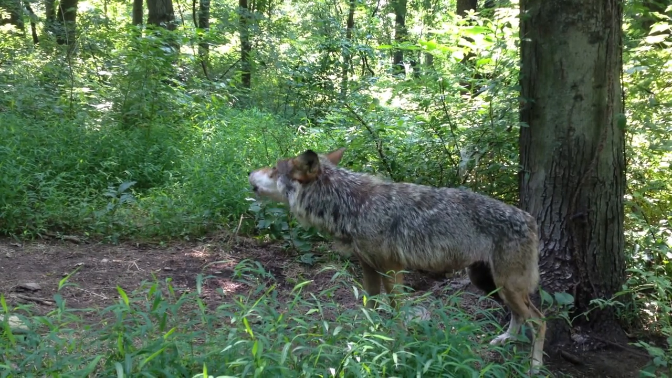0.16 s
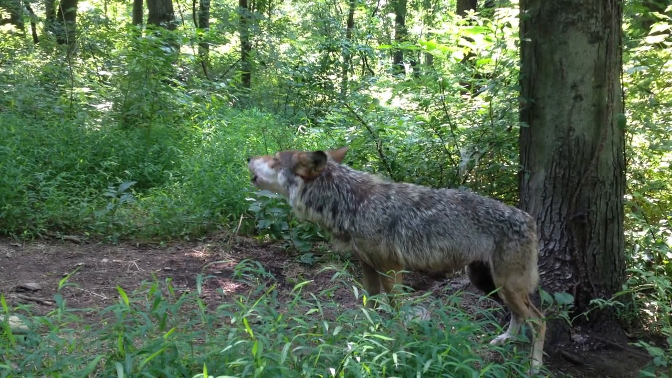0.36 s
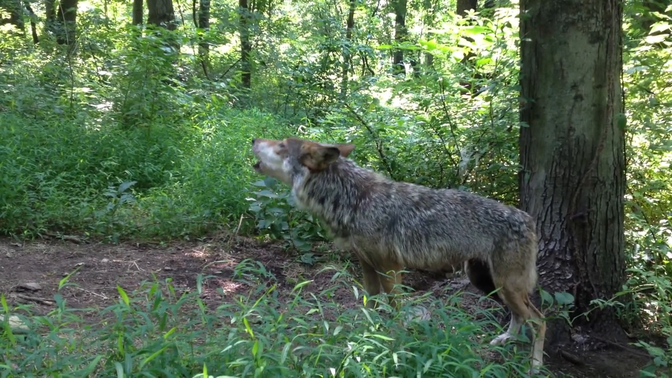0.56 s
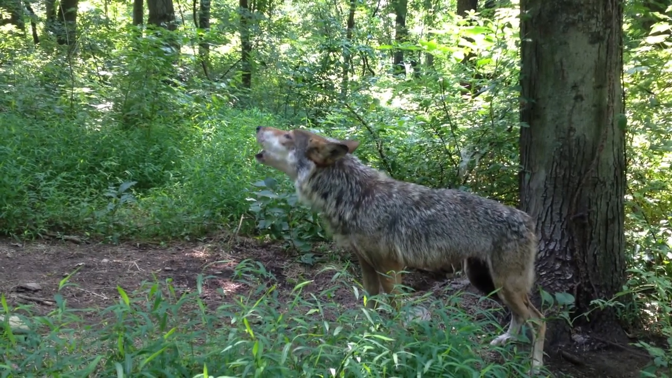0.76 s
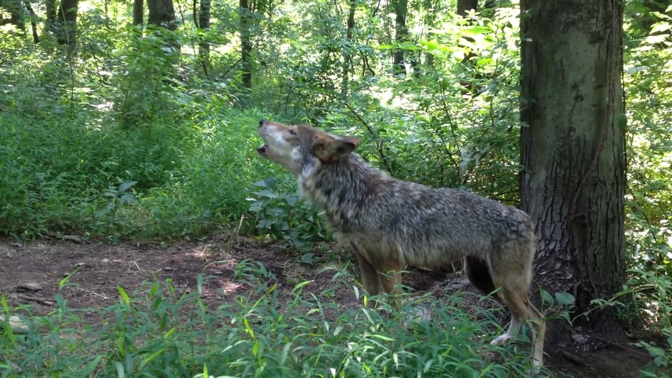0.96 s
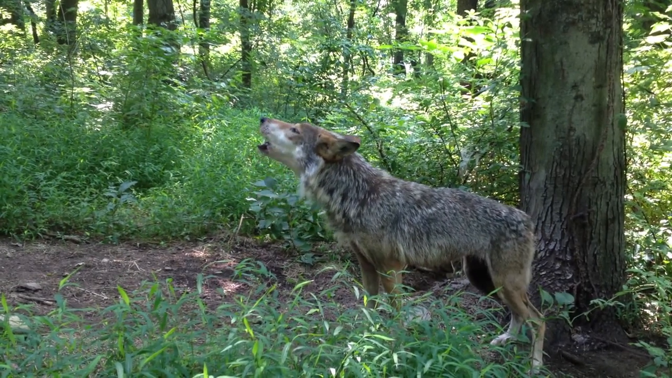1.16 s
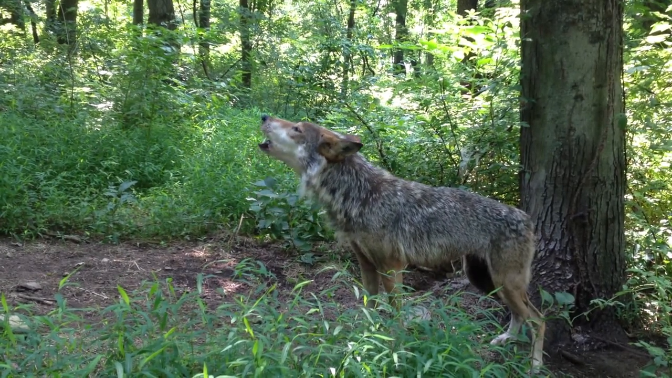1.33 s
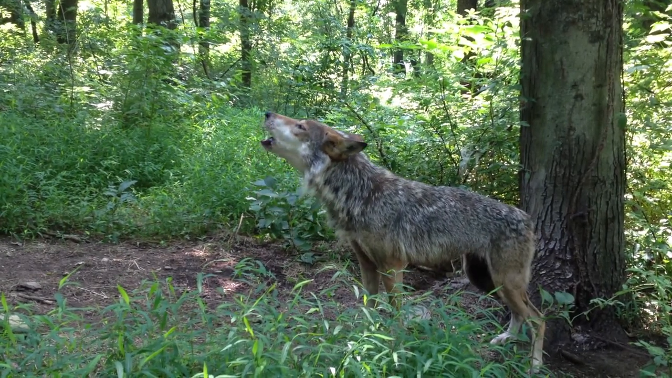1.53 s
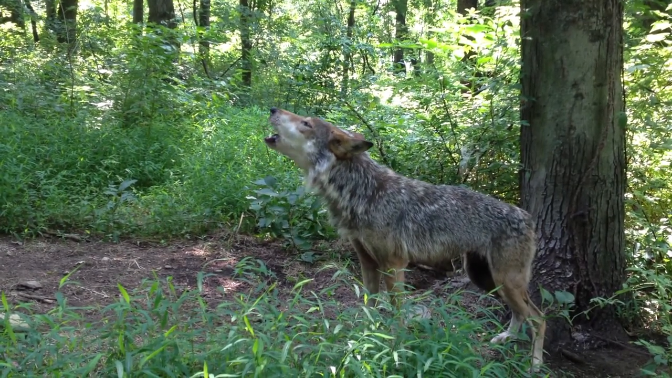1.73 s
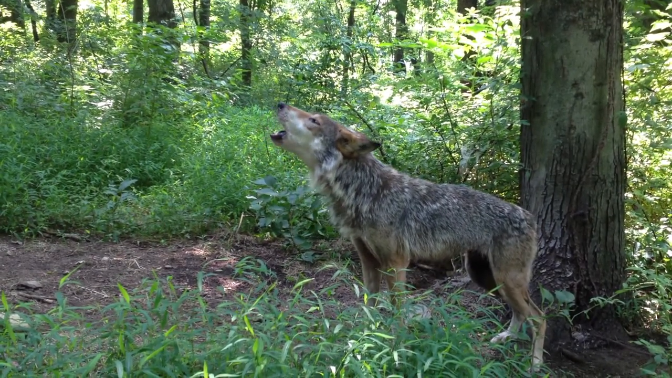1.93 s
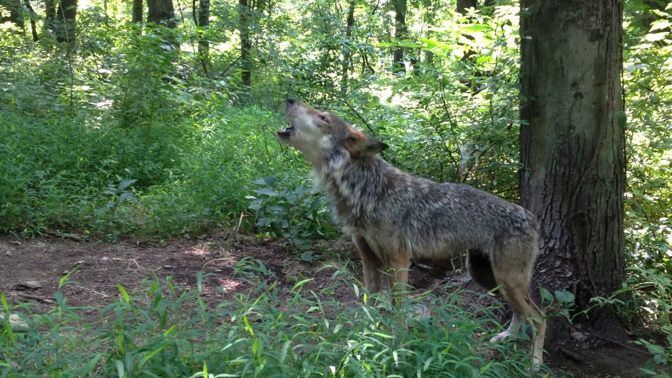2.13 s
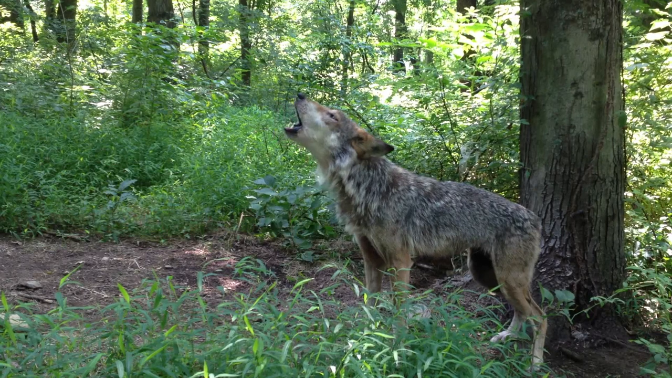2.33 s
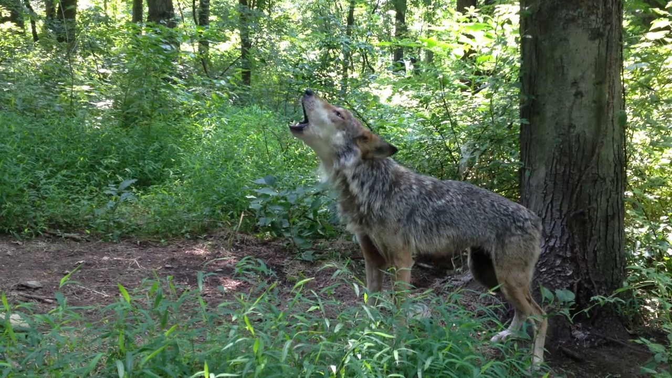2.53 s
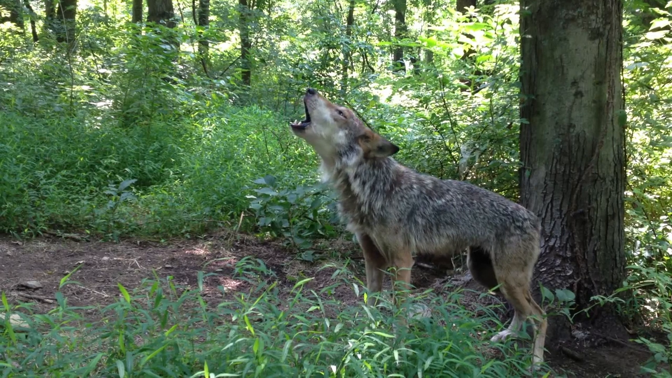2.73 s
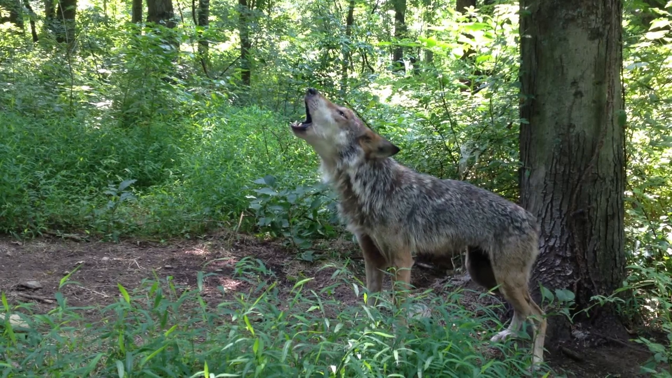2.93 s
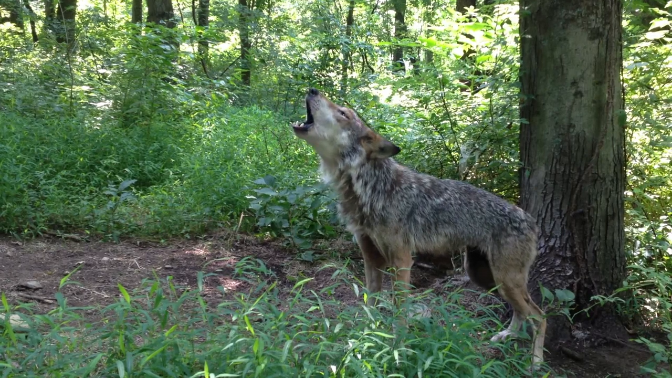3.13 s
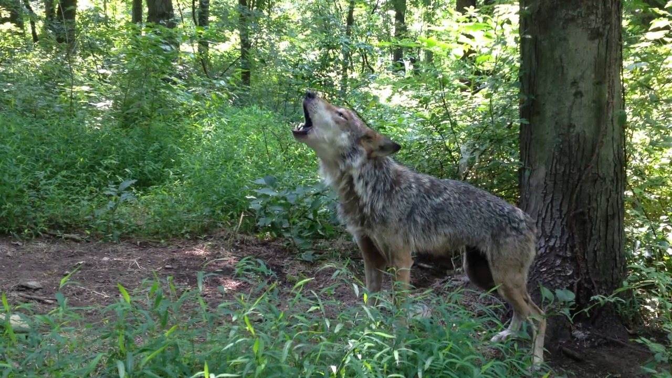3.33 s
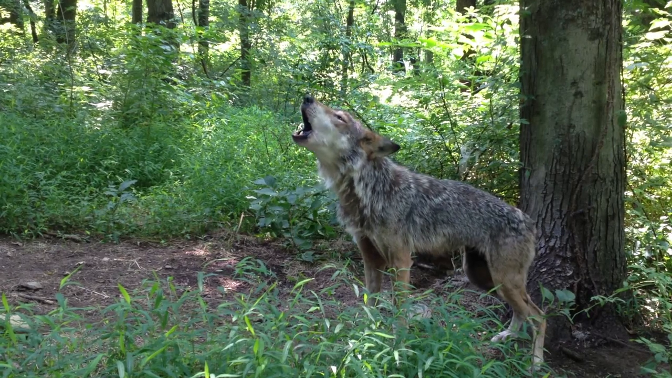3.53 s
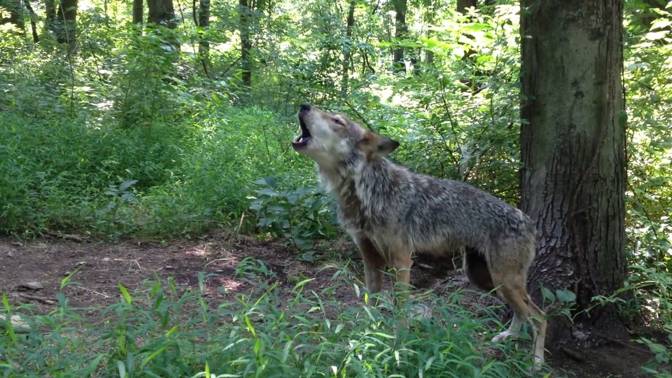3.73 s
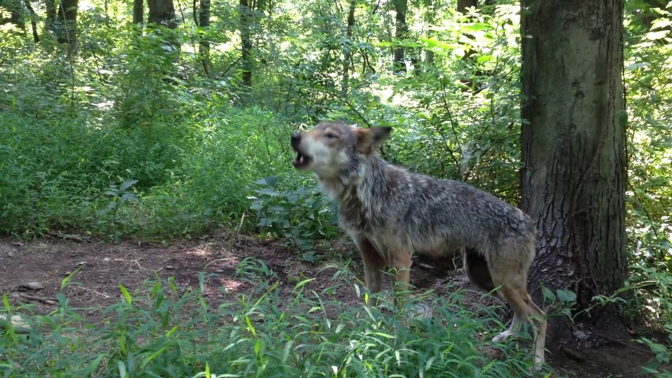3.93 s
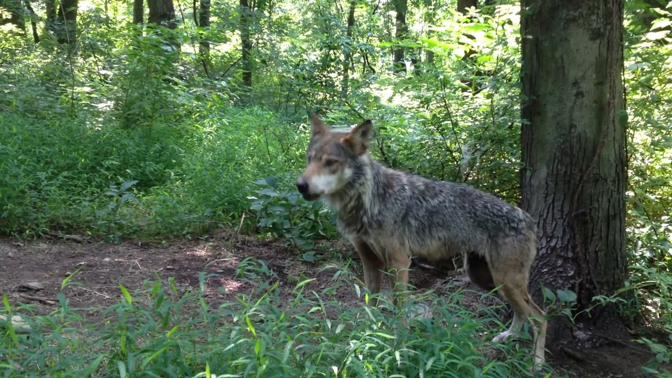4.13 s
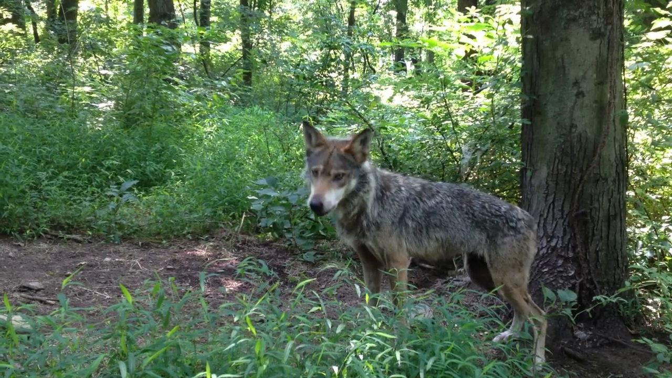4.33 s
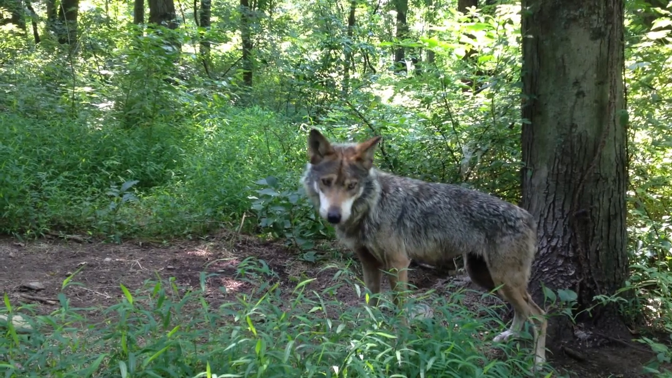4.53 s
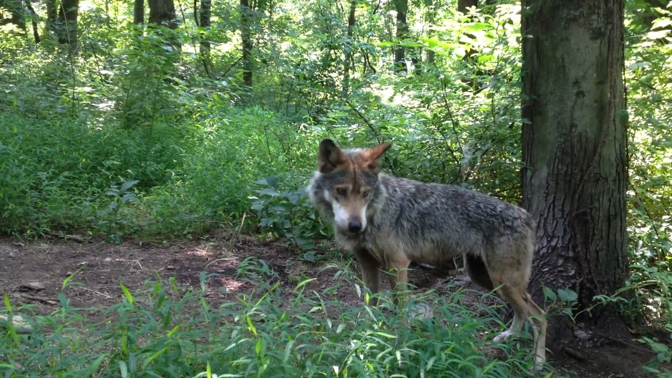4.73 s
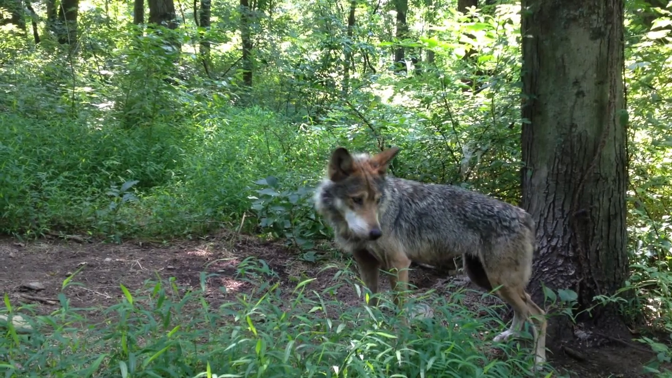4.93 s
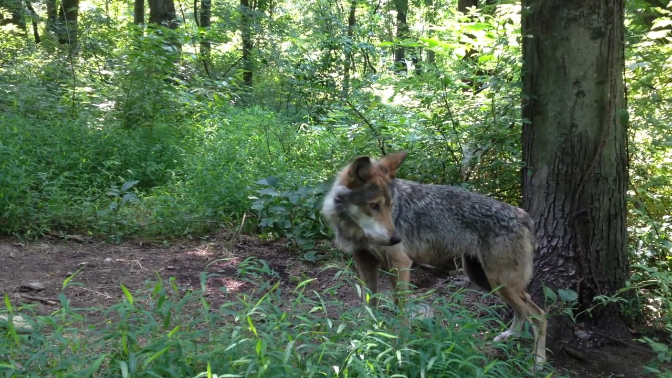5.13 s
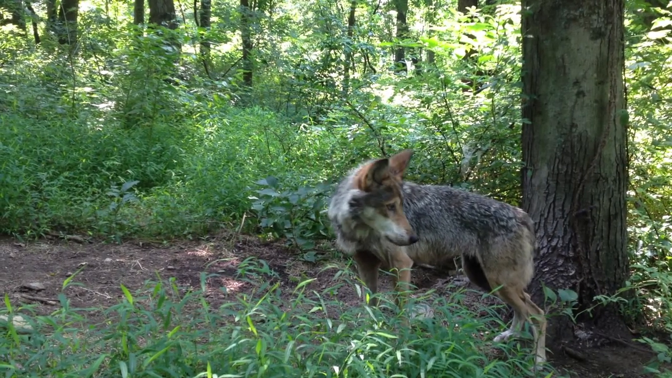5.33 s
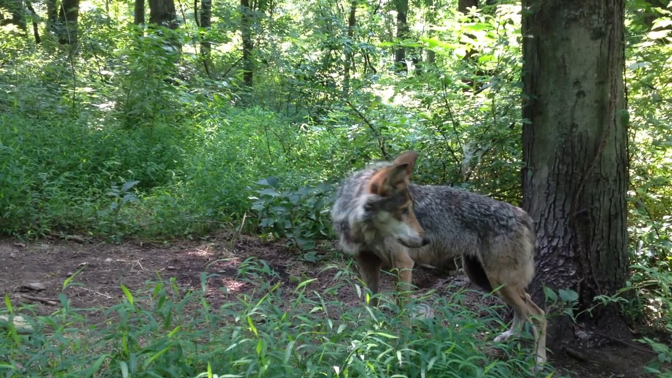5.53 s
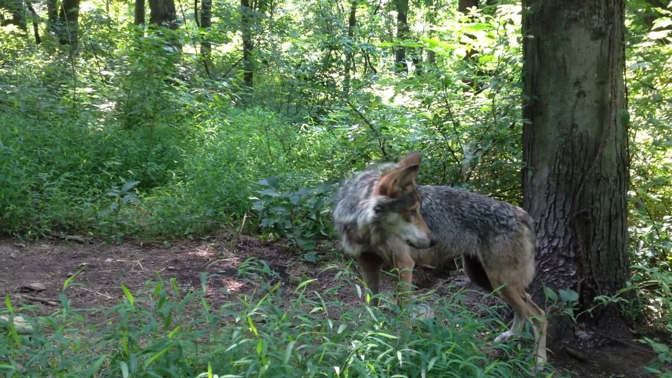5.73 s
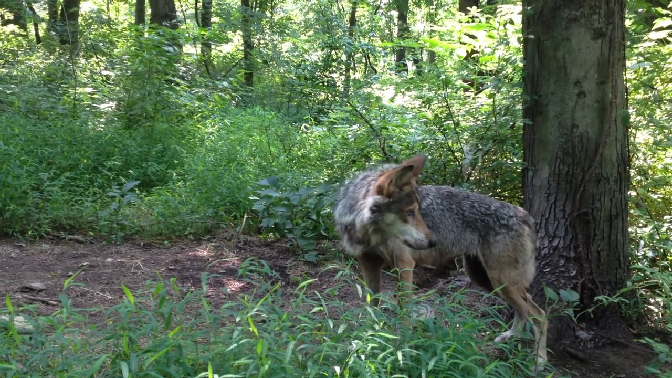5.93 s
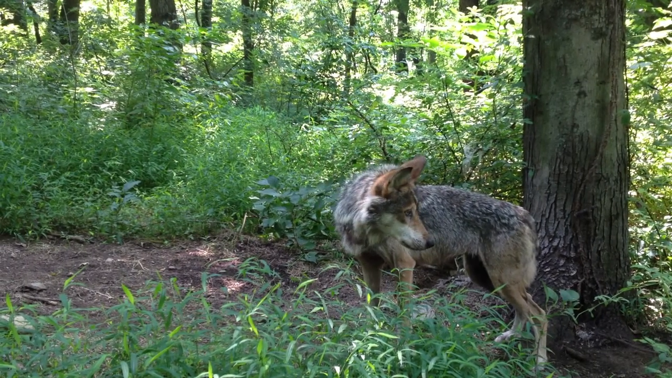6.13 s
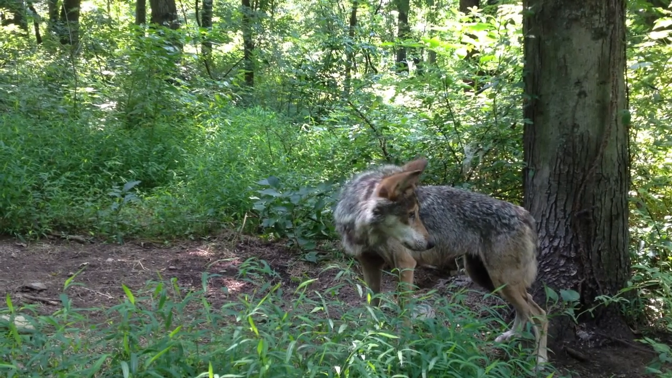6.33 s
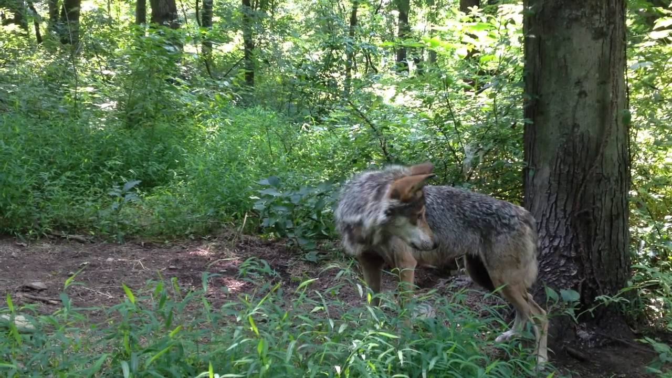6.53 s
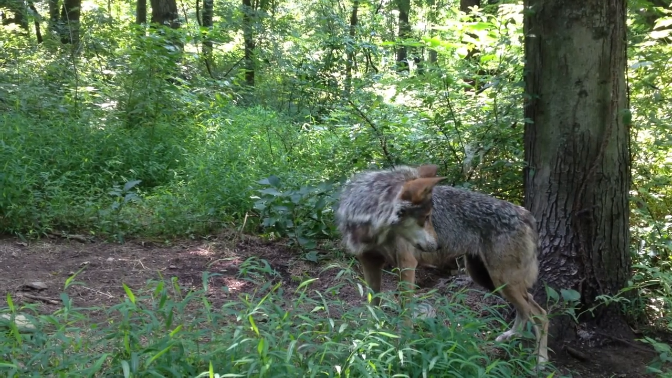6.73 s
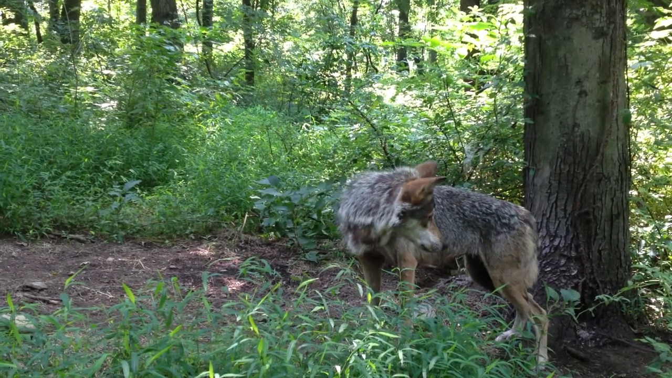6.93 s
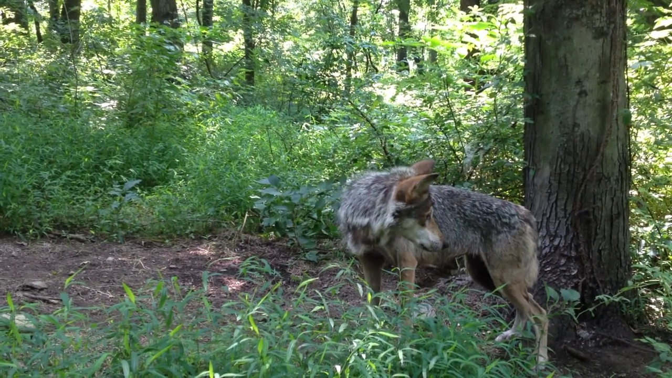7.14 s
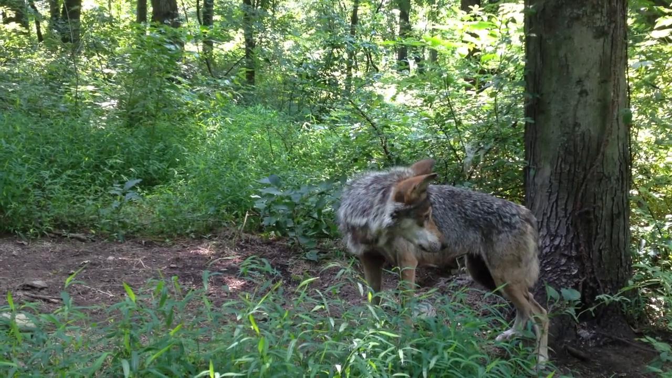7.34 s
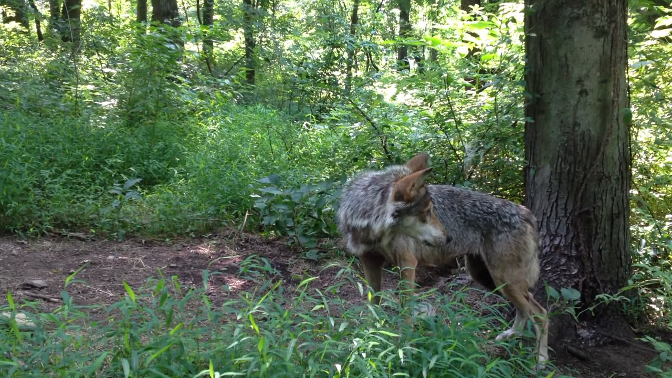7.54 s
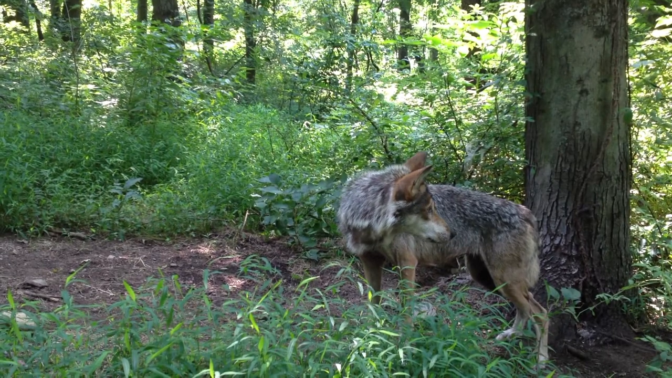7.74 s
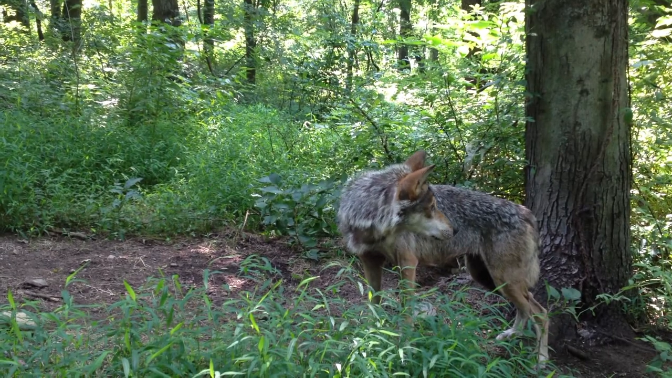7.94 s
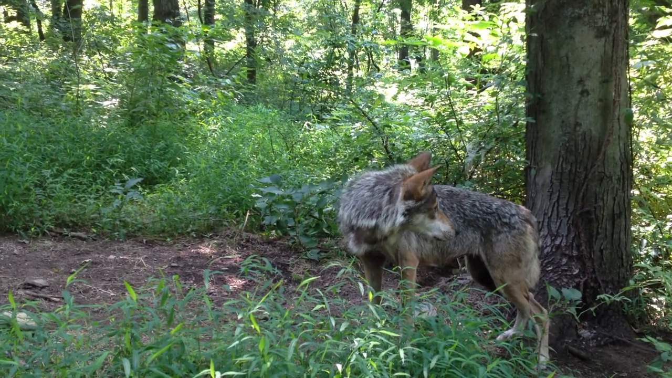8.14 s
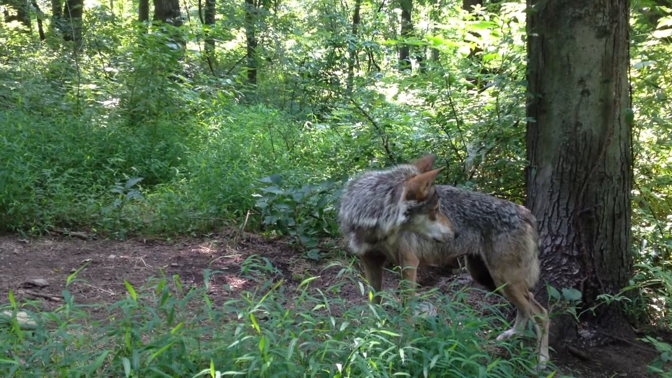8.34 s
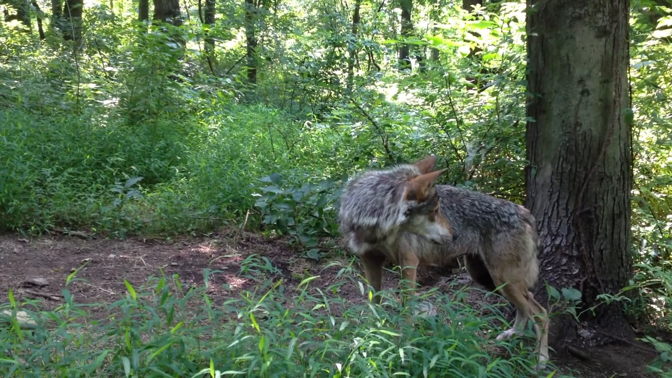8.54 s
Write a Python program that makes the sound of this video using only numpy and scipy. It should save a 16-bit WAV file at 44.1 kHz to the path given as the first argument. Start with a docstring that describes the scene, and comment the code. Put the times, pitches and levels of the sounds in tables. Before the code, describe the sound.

Very quiet woodland with faint steady leaf hiss. At 0 s a short indrawn breath; from 0.3 s a near wolf moans softly from about 150 Hz, sliding up to a steady 400-430 Hz by 0.8 s. At 2.0 s its voice cracks up to about 600, then near 780 Hz by 2.3 s, loud, bright and slightly rough, flipping down to 640 at 3.2 s and breaking off at 4.0 s. A farther wolf enters at 1.6 s near 400 Hz, jumps to 525 at 2.3 s and grows hoarse, beating against a lower pitch until 4 s. A tiny tick at 4.1 s. A third wolf rises from 3.9 s, strong and smooth at 400-430 Hz from 4.5 to 6.7 s, then falters and slides low by 7.4 s. Soft breaths at 6.6-7.6 s, a dull tick at 7.3 s, a barely audible last breath at 8.2 s. Short trunk echo; close, mono.

```python
"""A near wolf howls in a quiet summer wood: after a drawn breath it slides up and breaks between registers.
A farther wolf joins lower and splits into two pitches at once; a third answers with one long arch amid breaths.
Each howl is a stack of gliding sine partials coloured by the mouth, with air noise puffed by the folds.
Trunks scatter the voices into a short echo over a noise hiss of leaves, with small ticks and faint tones.
The microphone capsule bends loud sound slightly, and a limiter holds down the loudest peaks."""
import sys
import numpy as np
from scipy import signal
from scipy.fft import rfft, irfft, next_fast_len
from scipy.io import wavfile
from scipy.ndimage import uniform_filter1d, minimum_filter1d

SR = 44100
rng = np.random.default_rng(int(sys.argv[2]) if len(sys.argv) > 2 else 0)


def amplitude_ratio(level_db):
    """Convert a level in decibels to the matching linear amplitude (field) ratio."""
    exponent = np.asarray(level_db, float) / 20
    return 10 ** exponent


def unload_wav(signal):
    """Save mono or channel-first audio to the path in sys.argv[1] as 16-bit WAV at rate SR, clipped to [-1, 1]."""
    wavfile.write(
        sys.argv[1],
        SR,
        np.round(np.clip(np.atleast_2d(signal).T, -1, 1) * 32767).astype(np.int16),
    )


N = 377937

# hiss of leaves, spectrum before scaling to LEAVES_DB: (frequency [Hz], relative density [dB per Hz])
LEAVES_SPECTRUM = [(30, -54), (97, -5.5), (177, -4.5), (256, -3.5), (315, -15), (994, -8.5), (1360, -15.5),
                   (1510, -14), (2120, -26), (2610, -19.5), (3390, -17.5), (6870, -16), (10200, -30.5),
                   (15400, -22.5)]
LEAVES_DB = -64.5  # rms, before its slow swell
# small ticks: (time [s], amplitude before the decay [dB], frequency [Hz])
TICKS = [(4.094, -46, 3200), (7.2829, -30, 480)]
# faint tones, the last within the final breath: (start [s], length [s], frequency [Hz], level [dB])
FAINT_TONES = [(4.419, 0.27, 992, -59.5), (6.008, .17, 601, -58.5), (6.244, 0.28, 554, -51.5),
               (8.29, .25, 900, -72)]
# echo among the trunks: (frequency [Hz], time to fall 60 dB [s])
ECHO_T60 = [(300, 0.46), (1000, 0.63), (2200, 1), (4200, 0.15)]

# an indrawn breath before the near howl, an exhale as the answering howl ends:
# (start [s], rise [s], hold [s], level while held [dB], fade [dB per s])
BREATHS = [(0.005, .095, .1, -45.5, 70), (7.3, .1, .25, -65, 40)]
# soft breath noise during the near howl's rise, then breaths around the answering howl:
# (start [s], rise [s], hold [s], level while held [dB], fade [dB per s])
SOFT_BREATHS = [(0.501, 0.087, 0.05, -47.5, 87), (3.95, 0.17, 0.035, -53, 40),
                (6.549, .15, 0.21, -52.5, 51.5), (6.95, 0.17, 0.25, -61.5, 22),
                (8.23, 0.0803, .08, -65, 20)]
# airway of BREATHS: (resonance [Hz], width [Hz], relative level [dB])
BREATH_AIRWAY = [(650, 53, -5), (1120, 300, -12.5), (1770, 54, -19.5), (1920, 83, -22), (2320, 130, -20)]
# airway of SOFT_BREATHS: (resonance [Hz], width [Hz], relative level [dB])
SOFT_BREATH_AIRWAY = [(235, 100, -6), (500, 72, 2), (820, 95, 2), (1200, 87, -3), (1800, 190, -9),
                      (2390, 86, -15)]
BREATH_START_DB, BREATH_END_DB = -24, -24  # re the held level

# farther wolf, one break upward: (time [s], pitch [Hz], fundamental [dB], overtone lift [dB])
FAR_PITCH = [(1.63, 354.5, -40.5, -1.5), (1.7, 385.3, -36, 0.5), (1.95, 412.7, -23, -1.5),
             (2.06, 425.9, -22, -1), (2.15, 421.6, -23, -5.5), (2.29, 431.7, -26, 1.5),
             (2.296, 525, -18, -4.5), (2.4, 525, -19, 1.5), (2.5, 534.8, -21, -0.5),
             (2.7, 519.3, -21.5, -1.5), (2.8, 508.4, -21.5, 3), (3.0, 498.6, -24, 1),
             (3.16, 474, -24.5, 0.5), (3.36, 481.4, -25, 2.5), (3.48, 464.5, -26, 6.5),
             (3.55, 466.6, -27.5, -7)]
# its second, lower pitch, later left alone: (time [s], pitch [Hz], fundamental [dB], overtone lift [dB])
FAR_LOW_PITCH = [(2.95, 400.7, -45, 3), (3.081, 403.7, -33, -2), (3.32, 400, -37, 3.5),
                 (3.56, 405.2, -32, -3.5), (3.64, 396, -26, -4), (3.801, 381, -40.5, 8),
                 (3.96, 359, -33, 0.5), (4.02, 348.5, -50, -20.5)]
# answering wolf, one long arch that falters twice:
# (time [s], pitch [Hz], fundamental [dB], overtone lift [dB], treble trim re the fundamental [dB])
ANSWER_ARCH = [(3.87, 247.4, -52, -3, -16.5), (4.022, 229, -47.5, -0.5, -19),
               (4.258, 310.4, -36.5, -1, -27.5), (4.32, 355.9, -36.5, -1, -31.5),
               (4.36, 383.6, -32, 3, -40.5), (4.5, 399.4, -19.5, -0.5, -59.5),
               (4.77, 419.3, -14, -1, -54.5), (5.14, 429, -13, 0.5, -50.5),
               (5.32, 425.6, -13.5, -1.5, -54.5), (5.76, 410, -17.5, 0.5, -55),
               (6.0, 403.9, -18.5, 1.5, -46.5), (6.43, 407.7, -18.5, -0.5, -50.5),
               (6.7, 400.1, -20, -3, -46), (6.81, 386.7, -28.5, 1.5, -47), (6.875, 374.1, -34, 1.5, -36),
               (6.9, 368.6, -43, 16.5, -28.5), (6.92, 369.6, -32, 1, -32), (6.96, 350, -33, 6, -38),
               (7.028, 335, -31.5, 2.5, -44.5), (7.1, 302, -42.5, 8, -29.5), (7.158, 241.3, -53, 16, -33),
               (7.258, 184.8, -40.5, 0, -34), (7.39, 141, -54.5, -3, -26)]
# near wolf, one table a register:
# (time [s], pitch [Hz], fundamental [dB], overtone lift [dB], treble trim re the fundamental [dB])
NEAR_REGISTERS = [
    [(0.28, 153.4, -48.5, -13.5, -29), (0.374, 234.5, -45, 5.5, -21.5), (0.48, 308.3, -46, 15.5, -23),
     (0.552, 363.5, -42.5, 15.5, -23.5), (0.6, 380, -34, 13, -42), (0.71, 405, -22, 6, -47.5),
     (0.85, 420.8, -18, 2.5, -45.5), (1.02, 430, -18, 2, -46), (1.174, 431.5, -17, 0.5, -47),
     (1.386, 418.2, -18, 1, -40.5), (1.496, 410.9, -17.5, 4.5, -47.5), (1.722, 419.5, -14.5, 0.5, -40),
     (1.922, 441.6, -10, -1, -36.5), (2.0, 466.3, -6, -4.5, -41.5)],
    [(2.024, 571, -6, -7.5, -32.5), (2.08, 594.7, -8, 0, -30), (2.212, 647, -8, 3, -27),
     (2.235, 670, -8, 2.5, -25.5)],
    [(2.252, 747, -6.5, -8, -35), (2.272, 757.3, -7.5, -1, -28), (2.5, 786.6, -10, -2, -28.5),
     (2.606, 793.7, -11, -1.5, -27.5), (2.728, 782.3, -12, 4.5, -23), (2.822, 766.2, -12, -1, -28),
     (2.958, 777.5, -12, 1, -26.5), (3.198, 765.4, -12, 0.5, -27.5)],
    [(3.218, 676, -10.5, 3.5, -28.5), (3.24, 653.5, -10.5, -1, -31.5), (3.34, 639, -12.5, 0.5, -25.5),
     (3.608, 629.8, -15, -8, -28), (3.714, 647.7, -16, -8, -26.5), (3.79, 585, -20.5, -9.5, -25.5),
     (3.855, 546.5, -20, -7, -29), (3.888, 542.4, -23.5, -8.5, -24.5), (3.912, 541, -40, 7.5, -11)],
    [(3.925, 469, -41.5, 1.5, -12.5), (3.959, 466.7, -20.5, -15, -28), (3.972, 469.4, -23, -16, -34),
     (3.998, 466, -50, -5.5, -14)],
]

# mouths on partials 2 to 5, before the overtone lift: (frequency [Hz], level re the fundamental [dB])
FAR_MOUTH = [(740, -12), (850, -3), (940, -12.5), (1030, -1), (1180, -10.5), (1280, -11), (1430, -26),
             (1600, -16.5), (1720, -17), (2000, -36.5), (2150, -52.5)]
# answering wolf, first moan: (frequency [Hz], level re the fundamental [dB])
ANSWER_MOUTH_START = [(460, 4), (520, 1), (625, -8.5), (660, -1), (710, 5.5), (760, 1.5), (810, 8.5),
                      (900, -7.5), (980, -18), (1150, -17.5), (1500, -28.5), (1900, -23), (2100, -28.5)]
# answering wolf, early howl: (frequency [Hz], level re the fundamental [dB])
ANSWER_MOUTH_EARLY = [(768, -13.5), (790, -25), (805, -19), (850, -24), (950, -12.5), (1150, -18.5),
                      (1185, -12.5), (1205, -22), (1260, -24.5), (1540, -37), (1640, -38.5), (1700, -58),
                      (1920, -27.5), (2015, -23.5), (2100, -35), (2140, -44.5)]
# answering wolf, later howl: (frequency [Hz], level re the fundamental [dB])
ANSWER_MOUTH_LATE = [(600, -8.5), (710, -6.5), (745, -14.5), (782, -21), (805, -14), (850, -10.5),
                     (950, -15), (1100, -15.5), (1205, -9.5), (1240, -22), (1268, -31), (1290, -17.5),
                     (1315, -32), (1450, -29.5), (1640, -48.5), (1690, -50), (1750, -27), (2015, -22),
                     (2140, -41.5)]
# near wolf, lips still settling: (frequency [Hz], level re the fundamental [dB])
NEAR_MOUTH_EARLY = [(300, -9.5), (480, -11), (730, -3), (830, -17), (960, -23.5), (1085, -31.5), (1160, -7),
                    (1190, -30), (1208, -26), (1222, -16.5), (1290, -14), (1330, -32.5), (1540, -31),
                    (1620, -38), (1670, -29), (1900, -40), (2140, -56)]
# near wolf, mouth nearly shut: (frequency [Hz], level re the fundamental [dB])
NEAR_MOUTH_SHUT = [(800, -20), (860, -14.5), (930, -18.5), (1240, -10), (1290, -12), (1400, -17),
                   (1660, -38), (1760, -45.5), (1870, -34), (2070, -39), (2140, -54), (2300, -62.5)]
# near wolf, mouth open: (frequency [Hz], level re the fundamental [dB])
NEAR_MOUTH_OPEN = [(1070, -15), (1150, -4), (1300, -2), (1650, -22), (1850, -18), (1950, -14),
                   (2050, -26.5), (2300, -69.5), (2540, -37), (2900, -62.5), (3200, -32.5), (3350, -49)]
# near wolf, mouth wide: (frequency [Hz], level re the fundamental [dB])
NEAR_MOUTH_WIDE = [(1500, -2), (1590, -10.5), (2260, -46), (2310, -28.5), (2390, -23.5), (3020, -24.5),
                   (3150, -15.5), (3850, -46), (3980, -31.5)]

# throat on the upper partials, mouth open or wide: (frequency [Hz], relative level [dB])
THROAT_OPEN = [(2410, -3.5), (2860, -23), (3150, -9), (3700, -11.5), (6240, -16), (8270, -26.5),
               (8860, -22.5), (10400, -38), (11800, -41.5), (12700, -33.5), (13700, -28), (15400, -45.5)]
# throat on the upper partials, mouth nearly shut: (frequency [Hz], relative level [dB])
THROAT_SHUT = [(1350, -24.5), (2300, 10), (2470, -3.5), (2800, -22), (3400, -12.5), (4410, -14),
               (5080, -9.5), (6130, -14.5), (6690, -8), (7700, -19), (9440, -15.5), (10100, -28.5),
               (15000, -25.5)]
# narrow mouth ring, held from each time on: (time [s], centre [Hz], lift [dB])
MOUTH_RING = [(0, 5050, 15), (1.8, 2680, 8.5), (2.02, 4790, 5.5), (2.4, 5630, 7), (2.75, 6140, 13),
              (3.22, 5830, 13.5), (3.36, 5100, 7.5), (3.798, 3740, 19.5), (4.03, 3300, 17), (4.4, 5060, 12),
              (5.718, 5700, 12), (6.62, 2370, 9.5)]
# broader cavity ring, held from each time on: (time [s], centre [Hz], lift [dB])
CAVITY_RING = [(0, 3700, 4), (1.5, 3550, -7), (2.1, 4520, 10), (2.77, 3900, -5), (4.65, 3500, 11),
               (5.65, 4500, 3)]
# air noise under the pitch of the near and farther wolves: (frequency [Hz], relative level [dB])
RASP = [(60, -62), (290, -21.5), (520, 5), (800, -1), (1200, -8), (1500, -10.5), (2200, -21), (3000, -32.5),
        (6000, -52.5)]
# air noise under the pitch of the answering wolf: (frequency [Hz], relative level [dB])
ANSWER_RASP = [(60, -62.5), (220, -22.5), (340, -8.5), (480, 4), (560, -3.5), (650, -12.5), (750, -6.5),
               (950, -17.5), (1200, -19), (2200, -31.5), (6000, -55.5)]
# air noise past the teeth: (frequency [Hz], relative level [dB])
TEETH_HISS = [(1470, -55), (2500, -26), (2910, -14.5), (3090, -7), (3690, -26), (4010, -5), (5650, -5),
              (7840, -7), (9600, -25), (12100, -8.5), (15400, -21)]
# flutter of the overtones: (centre [s], half length [s], depth [0-1])
FALTERS = [(4.585, 0.17, 0.2), (6.877, 0.08, 0.5)]
# sidebands of the split voice, before BEAT_DB:
# (multiple of the pitch [1], multiple of the difference [1], level re the fundamental [dB])
SIDEBANDS = [(1, 1, -4), (1, 2, -6), (2, -1, -9.5), (2, 1, -7), (2, 2, -12)]
# strong-weak pulses of the near wolf's top register: (time [s], depth [dB])
DOUBLING = [(2.26, -28.5), (2.276, -14), (2.626, -5.5), (2.876, -25.5), (3.1, -26)]
# half lines at 0.5, 1.5 and 2.5 times the pitch, before the depth is added: (level re the fundamental [dB])
HALF_LINES_DB = [-20, -1, -9]

HALF_UPPER_DB, HALF_UPPER_SHARE = 12, 0.58  # upper half lines follow the depth less steeply
GAPE_FROM_HZ, GAPE_OVER_HZ, WIDE_FROM_HZ = 420, 100, 690  # the mouth opens with pitch, widest on top
SOFT_BELOW_HZ, SOFT_DB_PER_HZ = 340, 0.1  # below this pitch each further overtone is duller
AIRY_FROM_HZ, AIRY_DB = 8600, -11  # below the top register the highest partials drown in breath
BREAK_DIP_DB, BREAK_HISS_DB, BREAK_S = -16, 8, .045  # a break scrambles the overtones for a moment
RING_GLIDE_S = 0.021
BEAT_START_S, BEAT_RISE_S, BEAT_DB = 2.77, 0.27, -4  # the two pitches begin to mix, then hold
CHAOS_FROM_S, CHAOS_RISE_S, CHAOS_DB, CHAOS_HZ = 3.0, .15, -10, 170  # the split voice turns hoarse
WAKE_FROM_S, WAKE_OVER_S = 4.335, .06  # the answering wolf's soft moan gives way to the howl
SETTLE_FROM_S, SETTLE_OVER_S = 4.88, 0.58  # its mouth moves from the early shape to the later one
NEAR_SETTLE_FROM_S, NEAR_SETTLE_OVER_S = 0.95, 0.51  # the near wolf's lips settle
BEND = .02  # share of the squared pressure that the loud capsule adds


def evened(x):
    """Scales to rms 1."""
    return x / np.sqrt(np.mean(x ** 2) + 1e-20)


def read(points, hz):
    """Reads a spectrum on a log-frequency axis."""
    f, value = np.transpose(points)
    return np.interp(np.log(hz + 1), np.log(f + 1), value)


def add(mix, s, sound):
    """Mixes a sound in at time s."""
    part = mix[round(s * SR):][:len(sound)]
    part += sound[:len(part)]


def coloured(points, count):
    """Noise of rms 1 with the given spectrum."""
    size = next_fast_len(count)
    shape = amplitude_ratio(read(points, np.fft.rfftfreq(size, 1 / SR)))
    white = rfft(rng.standard_normal(size))
    return evened(irfft(white * shape, size)[:count])


def drift(t, hz):
    """Slow chance curve: normal random knots, hz of them a second, joined by straight lines."""
    knots = np.arange(t[0], t[-1] + 2 / hz, 1 / hz)
    return np.interp(t, knots, rng.standard_normal(len(knots)))


def patchy(x, t, db):
    """Turbulence comes in patches: random gain over a few hundred hertz and some tens of milliseconds."""
    z = signal.stft(x, nperseg=512)[2]
    patches = rng.standard_normal(z.T.shape)
    patches = uniform_filter1d(patches, size=6, axis=0)
    patches = uniform_filter1d(patches, size=5, axis=1)
    gain = amplitude_ratio(db * evened(patches).T)
    return evened(signal.istft(z * gain, nperseg=512)[1][:len(t)])


def columns(rows):
    """Sample times and curves of a table."""
    s, *values = np.transpose(rows)
    t = np.arange(s[0], s[-1], 1 / SR)
    return t, [np.interp(t, s, v) for v in values]


def partial(turns, db, t, shimmer):
    """One sine of rms level db whose height trembles by the shimmer."""
    height = np.sqrt(2) * amplitude_ratio(db) * (1 + shimmer * drift(t, 90))
    return height * np.cos(2 * np.pi * turns)


def leaves():
    """Faint steady hiss of the wood: coloured noise with a slow swell."""
    swell_db = 0.7 * drift(np.arange(N) / SR, 2.1)
    return amplitude_ratio(LEAVES_DB + swell_db) * coloured(LEAVES_SPECTRUM, N)


def trunks(x):
    """Echo off the trunks: sparse random reflections, each band dying at its own speed."""
    taps = np.zeros(SR)
    at = np.arange(700, SR - 20, 20)
    taps[at + rng.integers(0, 20, len(at))] = rng.choice([-1., 1.], len(at))
    hz, t, z = signal.stft(taps, SR, nperseg=256)
    decay = amplitude_ratio(-60 * t / read(ECHO_T60, hz)[:, None])
    tail = signal.istft(z * decay, SR, nperseg=256)[1]
    return signal.fftconvolve(x, tail / np.linalg.norm(tail))[:N]


def faint_tone(start, length, hz, db):
    """A thin wavering tone: one sine of unsteady pitch and height."""
    t = np.arange(0, length, 1 / SR)
    turns = np.cumsum(hz * (1 + .02 * drift(t, 30))) / SR
    return start, partial(turns, db, t, .6) * signal.windows.tukey(len(t), .4)


def tick(db, hz):
    """A soft-edged tick: a sine dying within a few milliseconds, with a little noise grit."""
    t = np.arange(400) / SR
    grit = .2 * rng.standard_normal(400) * np.exp(-t / .001)
    knock = np.sin(2 * np.pi * hz * t) * np.exp(-t / .0009)
    return amplitude_ratio(db) * np.minimum(t / .0004, 1) * (grit - knock)


def breath(start, rise, hold, peak_db, fade_db, airway):
    """Air noise through the resonances of nose and mouth, swelling quickly, holding and fading evenly."""
    t = np.arange(start, start + rise + hold - BREATH_END_DB / fade_db, 1 / SR)
    late = t - start - rise
    swell_db = BREATH_START_DB * (np.minimum(late, 0) / rise) ** 2
    db = peak_db + swell_db - fade_db * np.maximum(late - hold, 0)
    hz = np.geomspace(60, 8000, 200)
    shape = sum(amplitude_ratio(d) / np.abs(1 + 2j * (hz - f) / w) for f, w, d in airway)
    shape *= hz ** 2 / (hz ** 2 + 150 ** 2) / np.sqrt(1 + (hz / 3000) ** 6)  # less bass and treble
    air = coloured(np.transpose([hz, 20 * np.log10(shape)]), len(t))
    return start, amplitude_ratio(db) * patchy(air, t, 2.5) * signal.windows.tukey(len(t), .05)


def gape_of(t, hz):
    """How far the mouth is open, from the pitch: 0 nearly shut, 1 open, 2 wide."""
    opened = np.clip((hz - GAPE_FROM_HZ) / GAPE_OVER_HZ, 0, 1)
    widened = np.clip(2 * (hz - WIDE_FROM_HZ) / GAPE_OVER_HZ, 0, 1)
    return opened + widened


def shaken(hz):
    """How upset the folds are, 0-1: sets in just before a leap of pitch, grows with its size and settles."""
    fast = np.abs(np.gradient(hz)) > .2  # Hz a sample
    leap = np.abs(np.gradient(np.log(hz))) * fast / .15
    leap = uniform_filter1d(leap, size=500)
    upset = signal.lfilter([1], [1, -np.exp(-1 / (BREAK_S * SR))], leap)
    return np.minimum(np.roll(upset, -300), 1)


def lift(rows, t, hz, width_hz):
    """Decibels that a ring adds at hz; each row holds from its time on and melts into the next."""
    s, centre_hz, db = np.transpose(rows)[:, :, None]
    begun = np.clip((t - s) / RING_GLIDE_S + .5, 0, 1)
    share = begun - np.append(begun[1:], 0 * begun[:1], axis=0)
    return (share * db * np.exp(-((hz - centre_hz) / width_hz) ** 2)).sum(axis=0)


def upper(turns, hz, t, first):
    """Upper partials shaped by throat and rings, each wavering slowly and quickly by chance."""
    frames, slow_hz = t[::64], hz[::64]
    opening = gape_of(frames, slow_hz)
    gape = np.minimum(opening, 1)
    airy_db = AIRY_DB * np.minimum(2 - opening, 1)
    out = np.zeros(len(t))
    for k in np.arange(first, 36):
        line_hz = k * slow_hz
        db = gape * read(THROAT_OPEN, line_hz) + (1 - gape) * (read(THROAT_SHUT, line_hz) - 2)
        db -= np.maximum(385 - slow_hz, 0) / 6  # soft, low starts and ends are dull
        db += airy_db * np.clip((line_hz - AIRY_FROM_HZ) / 1500, 0, 1)
        db += lift(MOUTH_RING, frames, line_hz, 200) + lift(CAVITY_RING, frames, line_hz, 380)
        db += 3 * drift(frames, 2.5) + 3.5 * drift(frames, 25)
        height = amplitude_ratio(db) * (line_hz < 15400)
        out += np.interp(t, frames, height) * np.cos(2 * np.pi * (k * turns + rng.random()))
    return out * np.sqrt(hz / 500)


def bright(t, turns, hz, level_db, under_db):
    """Upper partials and hiss past the teeth; a break trades one for the other."""
    treble_db, upset = level_db + under_db, shaken(hz)
    sound = amplitude_ratio(treble_db + 2.5 + BREAK_DIP_DB * upset) * upper(turns, hz, t, first=6)
    hiss = patchy(coloured(TEETH_HISS, len(t)), t, 2.8)
    return sound + amplitude_ratio(treble_db - 10.5 + BREAK_HISS_DB * upset) * hiss


def howl(rows, mouths, opening, jitter, shimmer, rasp, rasp_db, extras):
    """Partials on one unbroken motion of the folds, coloured by the mouth; air noise puffs once a cycle."""
    t, (hz, level_db, lift_db, *treble) = columns(rows)
    gape = np.minimum(opening(t, hz), len(mouths) - 1)
    shares = [np.maximum(1 - np.abs(gape - i), 0) for i in range(len(mouths))]
    dull_db = SOFT_DB_PER_HZ * np.maximum(SOFT_BELOW_HZ - hz, 0)
    dip_db = BREAK_DIP_DB * shaken(hz)
    levels = [level_db]
    for k in range(2, 6):
        mouth_db = sum(w * read(m, k * hz) for w, m in zip(shares, mouths))
        levels.append(level_db + lift_db + dip_db * (k > 3) - (k - 2) ** 2 * dull_db + mouth_db)
    turns = rng.random() + np.cumsum(hz * (1 + jitter * drift(t, 120))) / SR
    flutter = sum(depth * np.exp(-((t - s) / half) ** 4) for s, half, depth in FALTERS)
    sound = np.zeros(len(t))
    for k, db in enumerate(levels):
        sound += partial((k + 1) * turns + k * k / 8, db, t, shimmer + flutter * (k > 0))
    effort = np.sqrt(sum(amplitude_ratio(db) ** 2 for db in levels))
    puffs = 1 + 0.13 * np.cos(2 * np.pi * turns)
    sound += amplitude_ratio(rasp_db) * effort * puffs * patchy(coloured(rasp, len(t)), t, 3.4)
    sound += extras(t, turns, hz, level_db, *treble)
    edge = np.clip(np.minimum(t - t[0], t[-1] - t) / 0.0063, 0, 1)
    voice = np.zeros(N)
    add(voice, t[0], sound * edge)
    return voice


def beating(t, turns, hz, level_db):
    """Two pitches mix: unsteady sidebands spaced by their difference, then hoarse first partials."""
    s, low_hz = np.transpose(FAR_LOW_PITCH)[:2]
    difference_hz = hz - np.interp(t, s, low_hz)
    beat = np.cumsum(difference_hz * (1 + 0.12 * drift(t, 30))) / SR
    bands = np.zeros(len(t))
    for m, n, side_db in SIDEBANDS:
        bands += partial(round(m) * turns + round(n) * beat, level_db + BEAT_DB + side_db, t, .45)
    hoarse = np.zeros(len(t))
    for k in (1, 2):
        hoarse += drift(t, CHAOS_HZ) * partial(k * turns + beat / 2, level_db + CHAOS_DB, t, .4)
    mixing = np.clip((t - BEAT_START_S) / BEAT_RISE_S, 0, 1) ** 2
    chaos = np.clip((t - CHAOS_FROM_S) / CHAOS_RISE_S, 0, 1)
    return mixing * bands + chaos * hoarse


def plain(*_):
    """No extras."""
    return 0


def far_wolf():
    """The farther wolf: two howls that overlap, from one mouth shape."""
    high = howl(FAR_PITCH, [FAR_MOUTH], gape_of, 0.0041, 0.034, RASP, -30.5, beating)
    low = howl(FAR_LOW_PITCH, [FAR_MOUTH], gape_of, 0.0013, .03, RASP, -23.5, plain)
    return high + low


def settling(t, hz):
    """The answering wolf's mouth shape over time: 0 first moan, 1 early, 2 late."""
    woken = np.clip((t - WAKE_FROM_S) / WAKE_OVER_S, 0, 1)
    return woken + np.clip((t - SETTLE_FROM_S) / SETTLE_OVER_S, 0, 1)


def answering_wolf():
    """The answering wolf: one arched howl through three mouth shapes."""
    mouths = [ANSWER_MOUTH_START, ANSWER_MOUTH_EARLY, ANSWER_MOUTH_LATE]
    return howl(ANSWER_ARCH, mouths, settling, 0.0028, .02, ANSWER_RASP, -34.5, bright)


def joined(tables):
    """Each register leans a sixth of the way toward the next until the voice flips."""
    rows = []
    for table in tables:
        if rows:
            last, following = rows[-1], table[0]
            leaning_hz = last[1] + (following[1] - last[1]) / 6
            rows.append((following[0] - .006, leaning_hz, *last[2:]))
        rows += table
    return rows


def near_opening(t, hz):
    """The near wolf's mouth shape: lips settling first, then opening with pitch."""
    settled = np.clip((t - NEAR_SETTLE_FROM_S) / NEAR_SETTLE_OVER_S, 0, 1)
    return settled + gape_of(t, hz)


def near_extras(t, turns, hz, level_db, under_db):
    """Treble, and lines halfway between the partials while strong and weak pulses alternate."""
    sound = bright(t, turns, hz, level_db, under_db)
    s, depth = np.transpose(DOUBLING)
    on = (t > s[0]) & (t < s[-1])
    depth_db = np.interp(t[on], s, depth)
    half = np.zeros(on.sum())
    for k, db in enumerate(HALF_LINES_DB):
        half += partial((k + .5) * turns[on], level_db[on] + depth_db + db, t[on], 0.034)
    upper_db = (level_db + under_db)[on] + HALF_UPPER_DB + HALF_UPPER_SHARE * depth_db
    half += amplitude_ratio(upper_db) * upper(turns[on], hz[on], t[on], first=3.5)
    fade = np.clip((s[-1] - t[on]) / 0.084, 0, 1)
    sound[on] += fade * half
    return sound


def near_wolf():
    """The near wolf: a howl leaping between registers through four mouth shapes."""
    mouths = [NEAR_MOUTH_EARLY, NEAR_MOUTH_SHUT, NEAR_MOUTH_OPEN, NEAR_MOUTH_WIDE]
    return howl(joined(NEAR_REGISTERS), mouths, near_opening, .0015, 0.047, RASP, -34.5, near_extras)


def scene():
    """Wolves, breaths, tones and ticks, echoing by three amounts among the trunks, and the leaves."""
    far, answer, near = far_wolf(), answering_wolf(), near_wolf()
    for row in FAINT_TONES:
        add(far, *faint_tone(*row))
    for row in SOFT_BREATHS:
        add(answer, *breath(*row, SOFT_BREATH_AIRWAY))
    for row in BREATHS:
        add(near, *breath(*row, BREATH_AIRWAY))
    for s, db, hz in TICKS:
        add(near, s, tick(db, hz))
    echo = trunks(amplitude_ratio(-23) * near + amplitude_ratio(-21) * answer + amplitude_ratio(-17) * far)
    no_bass = signal.butter(3, 110, "high", fs=SR, output="sos")
    return (signal.sosfilt(no_bass, near + answer + far + echo) + leaves())[None]


def roll_off(x):
    """The treble ends steeply here."""
    return signal.sosfilt(signal.butter(12, 15600, fs=SR, output="sos"), x)


def record(dry):
    """The capsule bends loud sound slightly, so two voices give their difference tone; a quick limiter."""
    no_rumble = signal.butter(2, 140, "high", fs=SR, output="sos")
    bent = dry + BEND * signal.sosfilt(no_rumble, dry ** 2)
    room = np.minimum(1, .94 / (np.abs(bent) + 1e-9))
    gain = uniform_filter1d(minimum_filter1d(room, size=401), size=201)  # ducks ahead of each peak
    return roll_off(bent * gain)


dry = scene()
out = record(dry)
unload_wav(out)
```